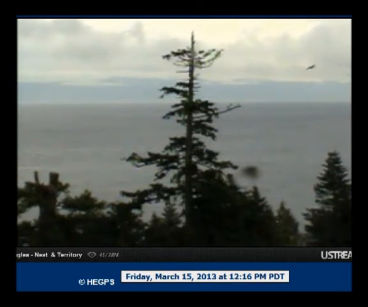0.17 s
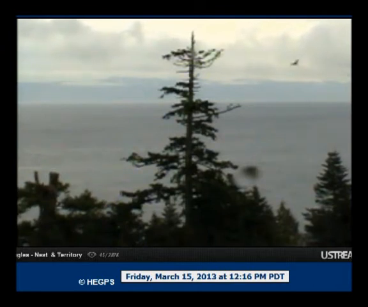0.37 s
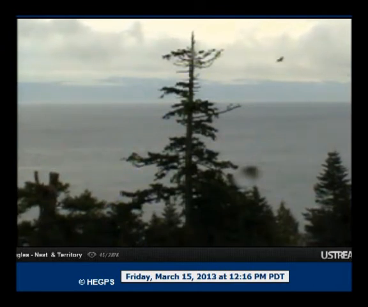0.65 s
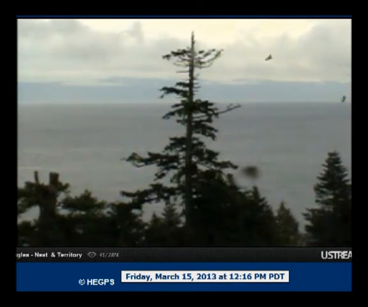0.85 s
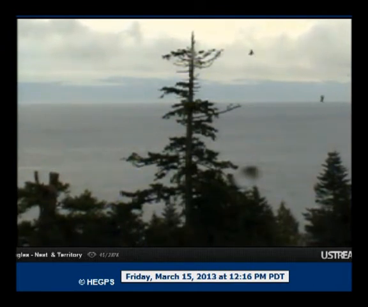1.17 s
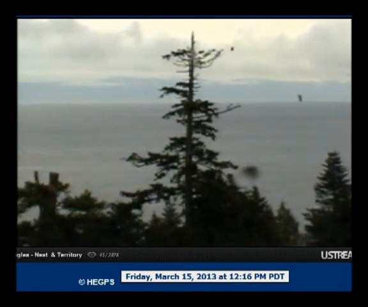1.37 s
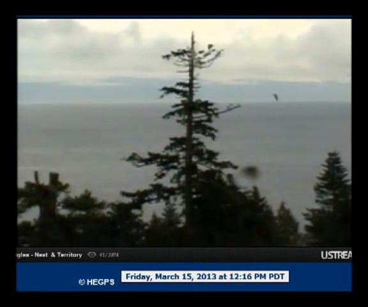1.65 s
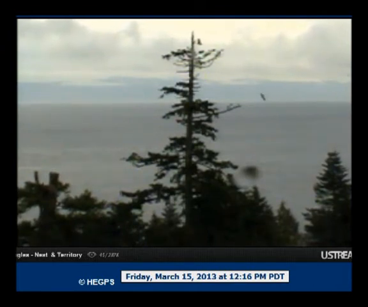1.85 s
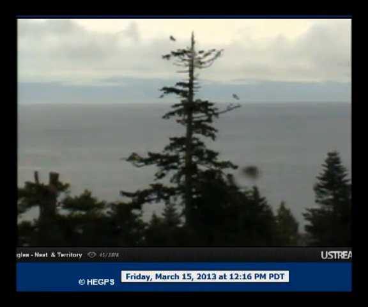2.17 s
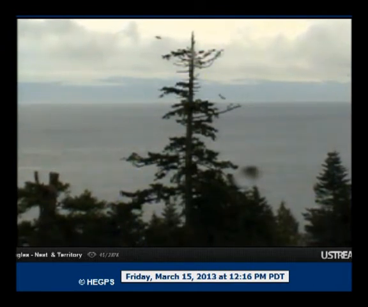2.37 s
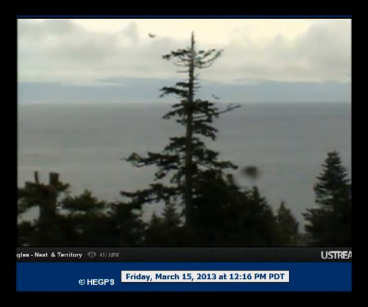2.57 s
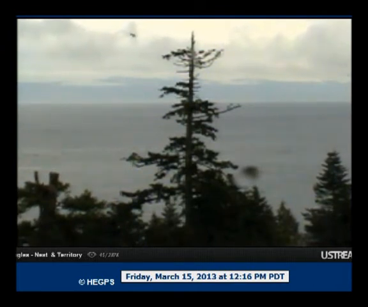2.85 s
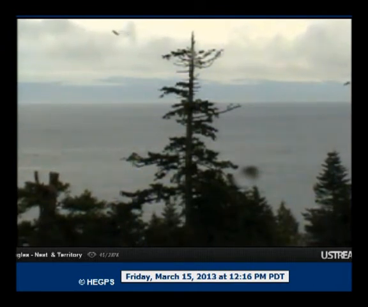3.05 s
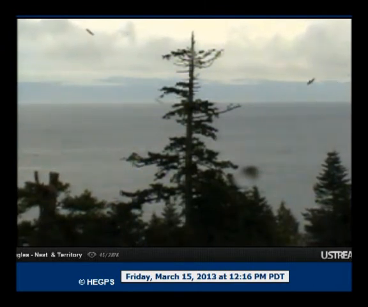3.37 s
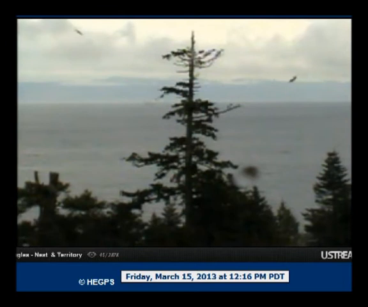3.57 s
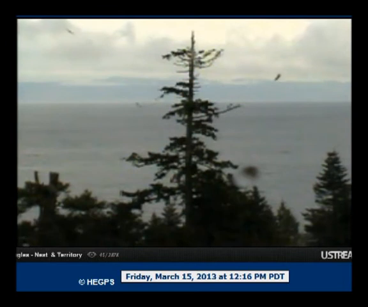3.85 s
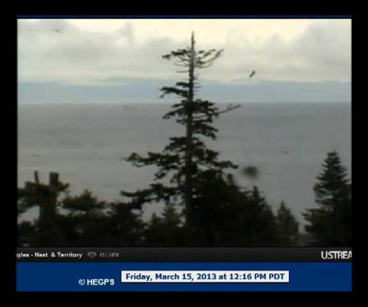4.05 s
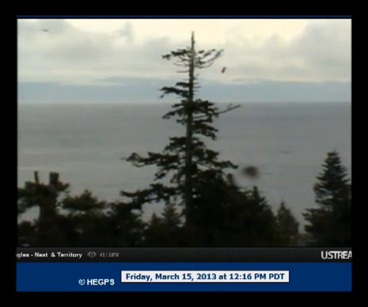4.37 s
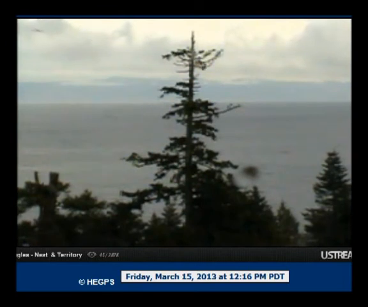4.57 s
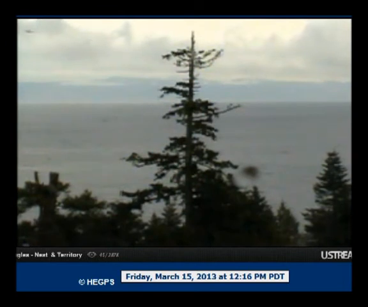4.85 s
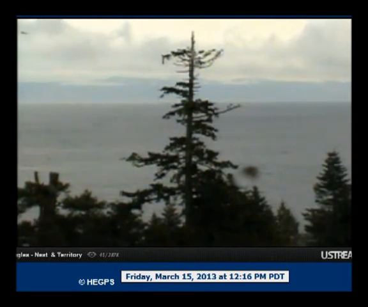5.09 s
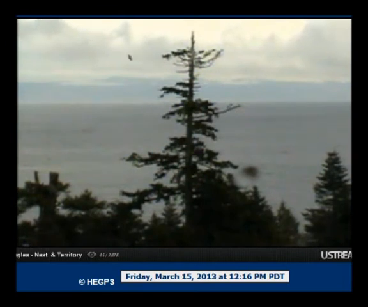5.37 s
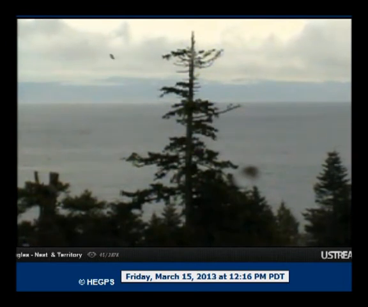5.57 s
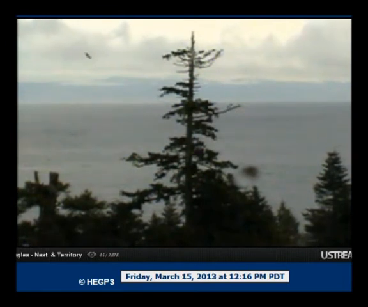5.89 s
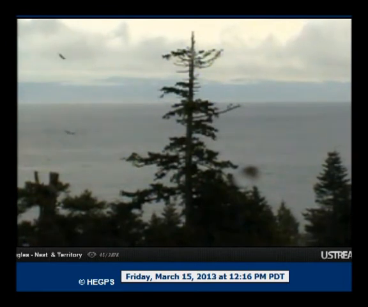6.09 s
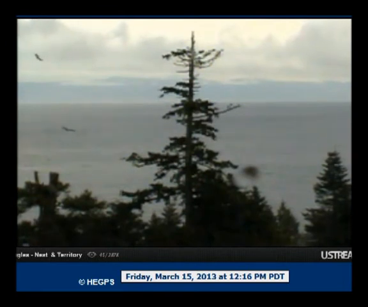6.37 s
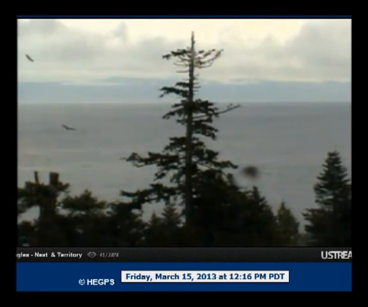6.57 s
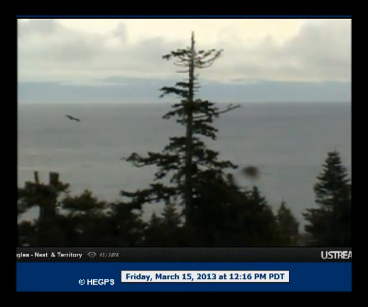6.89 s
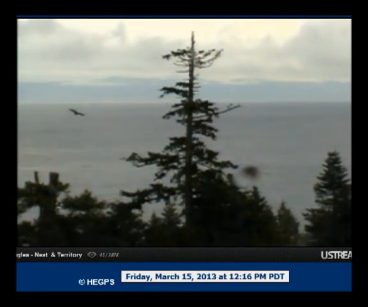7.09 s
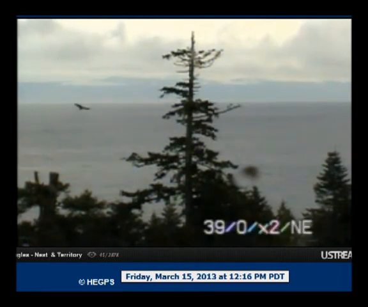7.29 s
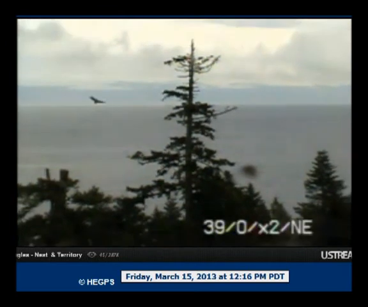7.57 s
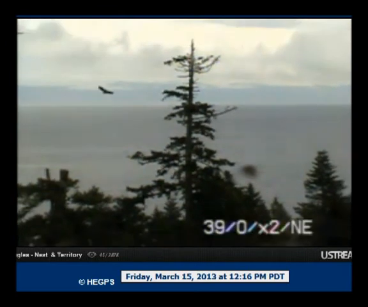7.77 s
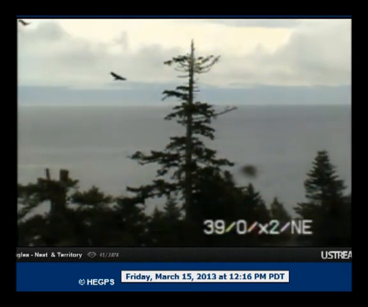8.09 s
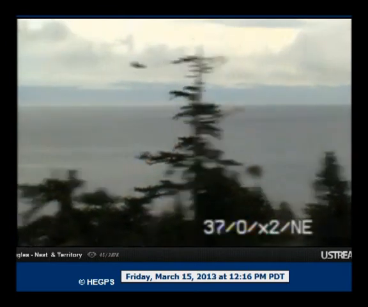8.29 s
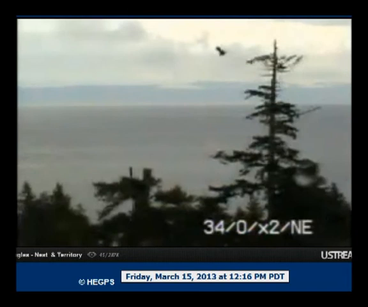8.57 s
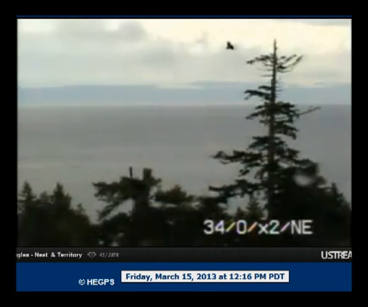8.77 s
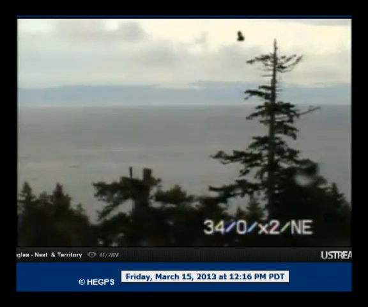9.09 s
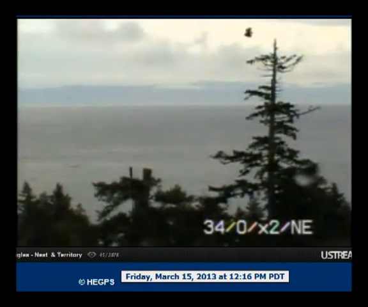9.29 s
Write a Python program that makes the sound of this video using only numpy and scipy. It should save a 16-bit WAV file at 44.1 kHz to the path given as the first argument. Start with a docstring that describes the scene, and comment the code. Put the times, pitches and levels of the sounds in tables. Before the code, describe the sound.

Among tall trees above the sea, eagles call in uneven runs of very brief, high, cracking chirps, starting about three seconds in and carrying on to the end with a light forest echo. Throughout, a far-off boat motor hums and wind buffets the slightly overdriven microphone, roughening the calls. Late on come a short whine and knock from a turning camera, then faint distant gull cries.

```python
"""Eagles chitter in tall trees above the sea: bursts of short, squeaky, raspy whistles, many breaking
to a lower voice, thrown back by near branches and the forest beyond. Far out on the water a boat engine
drones in a steady rumble. Wind thumps on the microphone, with a few rustles close by; near the end the
camera's pan motor whines and distant gulls mew. The outdoor microphone is overdriven by the rumble,
so the calls chop, crackle and distort, and it is sampled on an uneven clock."""
import sys
import numpy as np
from scipy import signal
from scipy.fft import rfft, irfft
from scipy.io import wavfile
from scipy.ndimage import uniform_filter1d, map_coordinates

SR = 44100
rng = np.random.default_rng(int(sys.argv[2]) if len(sys.argv) > 2 else 0)


def output_pcm(signal):
    """Save a mono or channel-first signal as 16-bit PCM at the path in sys.argv[1].

    Samples are clipped to [-1, 1] before scaling.
    """
    pcm = np.clip(np.atleast_2d(signal).T, -1, 1) * 32767
    wavfile.write(sys.argv[1], SR, np.round(pcm).astype(np.int16))


N = 415863
TIME = np.arange(N) / SR


def eagles(rasp_hz=172, chop_hz=120, throat_top_hz=4100, ordinary_db=-31):
    """Up in the trees, whistles scoop, dip and break; gives the sound sent to microphone and forest."""
    # calls: t/s, length/s, upper voice f/Hz, level/dB before the throat filter, break/share of call,
    # roughness/0-1, lower voice's slide/(Hz per ms), dip/share of pitch, loudest moment/share of call
    notes = [ (3.015, .058, 4000, -41.5, 0.7, 0.84, -19, 0, 0.09),
             (3.154, .02, 3960, -48, .5, .4, -26, .009, .45),
             (3.227, .045, 3980, -48, 0.65, 0.5, -12, 0, 0.28),
             (3.342, 0.018, 4000, -39, 0.84, 0.57, 0, 0.065, .6),
             (3.64, 0.03, 3790, -38.5, 1, 0.3, 0, 0, .5),
             (3.738, 0.032, 3820, -40.5, 0.68, .5, -10, 0, .45),
             (3.837, 0.019, 3710, -42, 0.95, .77, 0, 0.052, .5),
             (4.167, 0.058, 3910, -41, .82, 0.7, -19, 0.0014, 0.32),
             (4.403, .02, 3950, -43.5, 1, 0.53, 0, .01, .5),
             (4.534, 0.043, 3810, -40, 0.63, .8, -16, 0, 0.15),
             (4.961, 0.034, 3810, -31, 1, 0.63, -0.5, .16, 0.47),
             (5.073, 0.028, 3740, -28.5, 0.45, 0.4, 9, 0.021, 0.52),
             (5.205, 0.026, 3210, -31, 1, 0.15, 0, 0.11, 0.44),
             (5.669, 0.013, 3340, -44.5, 1, .1, 0, 0, .5), (5.755, 0.044, 3820, -36, 0.68, 0.6, -9, 0, .33),
             (5.862, 0.031, 3770, -31.5, 1, 0.5, 0, 0.032, 0.43),
             (5.963, 0.019, 3730, -36, 0.83, 0.5, -0.5, 0.041, .55),
             (6.403, .034, 4020, -33, .35, 0.4, 4, 0.026, 0.41),
             (6.509, .045, 3860, -39.5, 0.5, 0.55, -25, 0.02, 0.46),
             (6.605, 0.04, 3890, -42.5, .67, 0.7, -25, 0, 0.38),
             (6.743, 0.016, 3450, -45.5, 1, .5, 0, 0.0052, .5),
             (6.852, 0.042, 3640, -24, .02, 0.67, 8.5, 0.015, 0.49),
             (6.979, 0.049, 3750, -35, 0.67, .8, -5, 0.014, 0.4),
             (7.111, 0.027, 3820, -31.5, 1, 0.4, 0, .02, .25),
             (7.804, .05, 3930, -38.5, .82, .6, -15.5, 0, .42),
             (8.03, .037, 3960, -39, 0.76, 0.43, -19, 0.016, .4),
             (8.156, .04, 3950, -44.5, 0.5, 0.45, -22, 0.00015, .45),
             (8.276, 0.033, 3780, -35, 1, 0.96, 0, .11, .58),
             (8.391, 0.025, 3257, -30, 1, 0.36, 0, 0.053, 0.58),
             (8.497, 0.017, 3230, -36, .93, 0.4, -2, .077, .5),
             (8.864, .021, 3475, -36.5, 0.8, 0.4, 1, 0.032, .45),
             (9.058, 0.038, 3715, -34.5, 0.86, 0.39, 0, 0.073, 0.4),
             (9.168, .02, 3530, -35, 0.96, .33, 2, 0, 0.54), (9.28, .021, 3350, -32, 1, 0.2, 0, .145, 0.43),
             (9.398, 0.029, 3330, -30, 1, 0.45, 0, 0.17, 0.59)]
    direct, to_forest = np.zeros(N), np.zeros(N)
    warble, flutter = drift(2 * rasp_hz), drift(rasp_hz)
    grit = from_db(-5.5) * (band_noise(100, 750) + 1j * band_noise(100, 750))
    # the calls are chopped as engine hum overloads the microphone
    overload_chop = np.sin(phase_of(chop_hz * (1 + .25 * warble)))
    shake_db = 2.5 * flutter + 3.5 * overload_chop
    for start, length, hz, level_db, breaks_at, upper_roughness, slide, dip, loudest_at in notes:
        at, progress = during(start, length)
        since_break = (progress - breaks_at) * length
        broken = .5 + .5 * np.tanh(since_break / .0004)   # abrupt flip: 0 upper voice, 1 lower
        roughness = upper_roughness * .43 ** broken   # the lower voice is cleaner
        scoop = .12 * np.exp(-progress * length / .0025)
        sag = .017 * (progress - .5)
        pitch_dip = dip * np.exp(-((progress - .58) / .26) ** 2)
        upper_hz = hz * (1 - scoop - sag - pitch_dip)
        # the lower voice slides and arches about its own middle
        from_middle_ms = 1000 * length * (progress - (1 + breaks_at) / 2)
        lower_hz = .855 * hz + slide * from_middle_ms - .5 * from_middle_ms ** 2
        pitch = (upper_hz + broken * (lower_hz - upper_hz)) * (1 + .048 * roughness * warble[at])
        whistle = np.exp(1j * phase_of(pitch))
        edges = np.minimum(progress / .13, (1 - progress) / .16).clip(0, 1)
        catch_db = 10 * np.exp(-(since_break / .002) ** 2)   # the voice catches on the flip
        voice_db = 3.5 * broken - catch_db - 17.5 * np.abs(progress - loudest_at)
        envelope = rms_one(np.sin(np.pi / 2 * edges) ** 2 * from_db(voice_db + roughness * shake_db[at]))
        call = envelope * np.imag(whistle * (1 + roughness * grit[at]))
        direct[at] += from_db(level_db) * call
        # a bird facing the microphone is louder, its echo only slightly so
        to_forest[at] += from_db(ordinary_db + .25 * (level_db - ordinary_db)) * call
    return butterworth([direct, to_forest], throat_top_hz, order=10)


def call_distortion(calls, low_below_hz=3000, overload_db=-28.5):
    """Loud, low calls distort in the overloaded microphone, adding a harsh octave and a noisy spray."""
    low_calls = butterworth(calls, low_below_hz, order=8)
    power = uniform_filter1d(low_calls ** 2, size=64)
    drive = 1 + power / from_db(overload_db) ** 2
    octave = from_db(.5) * butterworth(drive * calls ** 2, 6200, order=4, kind="high")
    spray = from_db(3) * power * band_noise(5200, 7600)
    return octave + spray


def overload_crackles(half_length_s=.0015):
    """Brief, bright crackles of microphone overload during a few calls."""
    # crackles: t/s, level/dB
    crackles = [(3.025, -47), (4.183, -52), (4.542, -47), (4.980, -46), (6.875, -43), (6.999, -48)]
    envelope = sum(swell(centre, half_length_s, level_db) for centre, level_db in crackles)
    return envelope * band_noise(3760, 5570)


def ringing(start_s=8.88, length_s=.24, hz=3410, level_db=-54):
    """A thin tone lingers after one call and wavers in level."""
    out = np.zeros(N)
    at, progress = during(start_s, length_s)
    envelope = fade_ends(progress, length_s, edge_s=.02) * from_db(level_db + 3.5 * drift(25)[at])
    out[at] = np.sqrt(2) * envelope * np.sin(2 * np.pi * hz * TIME[at])
    return out


def tree_echoes(calls, to_forest, blur_hz=150):
    """Near branches answer at once; the forest beyond gives a long, diffuse echo, blurred in pitch."""
    # strength of the far echo: t/s, gain/dB
    echo_gain = [(3.0, -16.5), (7.2, -14.5), (7.8, -18.5), (8.15, -16.5), (8.6, -6), (9.4, -9.5)]
    near = from_db(-13.5) * scatter(calls, echoes_per_s=2700, t60_s=.054)
    diffuse = to_forest * drift(blur_hz) * from_db(np.interp(TIME, *np.transpose(echo_gain)))
    return near + scatter(diffuse, echoes_per_s=770, t60_s=1)


def scatter(x, echoes_per_s, t60_s):
    """Trunks and branches throw back a thin, dying spray of echoes."""
    t = TIME[:SR]
    echoes = rng.standard_normal(SR) * (rng.random(SR) < echoes_per_s / SR)
    spray = echoes * (t > .004) * from_db(-60 * t / t60_s)
    return signal.fftconvolve(x, rms_one(spray) / np.sqrt(SR))[:N]


def boat_engine(waver_db=2.5, wander_hz=.693):
    """Low engine lines fade and wander on their way over the water; the strong hum swells as one."""
    # engine lines: f/Hz, rms level/dB before swell and waver
    lines = [(40.5, -32.5), (58.5, -32), (64, -34), (83, -35.5), (120.5, -28.5), (125.5, -25), (129, -25),
             (136, -25.5), (146.5, -25.5), (193, -34.5), (211, -37.5), (257.6, -37), (276, -42.5),
             (322, -42.5), (340, -35.5), (359, -41.5), (404, -47)]
    # swell and ebb of the hum: t/s, gain/dB
    hum_swell = [(0, -1.5), (1.1, -2.5), (1.75, 3.5), (2.1, 1), (2.4, 2.5), (3.1, -1), (3.5, 3), (3.8, -3),
                 (4.6, -3), (5.2, 2.5), (5.95, -4.5), (6.3, 4.5), (6.6, -4.5), (7.0, 2.5), (7.5, -5),
                 (7.8, 0), (8.55, 3.5), (9.4, -5.5)]
    out, swell_db = np.zeros(N), np.interp(TIME, *np.transpose(hum_swell))
    for hz, level_db in lines:
        phase = 2 * np.pi * rng.random() + phase_of(hz + wander_hz * drift(1.5))
        in_hum = 115 < hz < 140
        envelope = from_db(level_db + in_hum * swell_db + waver_db * drift(1.92))
        out += np.sqrt(2) * envelope * np.sin(phase)
    return out


def rumble(level_db=-19):
    """Wind, sea and exhaust merge into a bed of low noise, lifted at a few hollow resonances."""
    # spectrum of the bed: f/Hz, relative density/dB
    spectrum = [(10, -20), (25, -8), (50, -6.5), (75, -1), (110, 3), (170, -4), (240, -12), (300, -9),
                (470, -19), (720, -23), (1050, -23.5), (2000, -34.5), (3200, -43.5), (5000, -94.5)]
    # hollow resonances: f/Hz, width/Hz, lift/dB
    hollows = [(124.8, 25.3, 6), (348, 64, 9), (591, 78, 9.5), (818, 60, 6.5)]
    hz = np.maximum(np.arange(N // 2 + 1) * SR / N, 1)
    point_hz, point_db = np.transpose(spectrum)
    colour_db = np.interp(np.log(hz), np.log(point_hz), point_db)
    for centre, width, lift_db in hollows:
        colour_db += lift_db / (1 + (2 * (hz - centre) / width) ** 2)
    noise = irfft(rfft(rng.standard_normal(N)) * from_db(colour_db), N)
    return from_db(level_db) * rms_one(noise)


def wind(breeze_db=-33):
    """A steady breeze and a few gusts thump right on the microphone, in the deep bass."""
    # gusts: centre t/s, half length/s, level/dB
    gusts = [(2.15, 0.48, -26.5), (5.2, 1.6, -24), (6.8, 0.22, -20), (7.24, .18, -17.5), (8.0, .35, -27),
             (9.2, 0.16, -22.5)]
    power = from_db(breeze_db) ** 2 + sum(swell(*gust) ** 2 for gust in gusts)
    return np.sqrt(power) * band_noise(21.4, 85)


def pan_motor(start_s=8.47, stop_s=8.66, first_hz=1232, full_hz=1297, knock_hz=1220):
    """The camera turns: its motor whines higher and louder as it speeds up, then halts with a knock."""
    whine, length = np.zeros(N), stop_s - start_s
    at, speed = during(start_s, length)
    pitch = (first_hz + (full_hz - first_hz) * speed) * (1 + .008 * drift(40)[at])
    envelope = fade_ends(speed, length, edge_s=.01) * from_db(np.interp(speed, [0, 1], [-42, -29.5]))
    whine[at] = np.sqrt(2) * envelope * np.sin(phase_of(pitch))
    since_knock = TIME - stop_s - .022
    knock_envelope = (since_knock / .0055).clip(0, 1) * np.exp(-np.abs(since_knock) / .022)
    return whine + from_db(-29) * knock_envelope * band_noise(knock_hz / 1.11, knock_hz * 1.12)


def rustles():
    """Soft, brief swells of mid-range noise close to the microphone."""
    # rustles: centre t/s, half length/s, f/Hz, level/dB
    stirs = [(1.37, 0.11, 1750, -40.5), (1.66, 0.068, 1520, -41), (2.007, 0.1, 1600, -40),
             (5.522, 0.015, 1310, -34.5)]
    return sum(swell(centre, half_length, level_db) * band_noise(hz / 1.41, hz * 1.23, order=3)
               for centre, half_length, hz, level_db in stirs)


def gulls(climb_share=.66):
    """Far off, each mew climbs slowly, brightens and drops at its end."""
    # cries: t/s, length/s, top f/Hz, fundamental's starting level/dB, second harmonic's final level/dB
    cries = [(9.012, .36, 1478, -42, -50.5), (9.129, 0.2, 1206, -52, -47)]
    out, judder = np.zeros(N), 1 + .0074 * drift(40)
    for start, length, top_hz, first_db, second_db in cries:
        at, progress = during(start, length)
        climb = .15 * (1 - progress / climb_share) ** 2
        drop = .19 * ((progress - climb_share) / (1 - climb_share)) ** 2
        below_top = np.where(progress < climb_share, climb, drop)
        phase = phase_of(top_hz * (1 - below_top) * judder[at])
        fundamental = from_db(first_db - 8 * progress) * np.sin(phase)
        second = from_db(second_db + 10 * (progress - 1)) * np.sin(2 * phase)
        out[at] += np.sqrt(2) * fade_ends(progress, length, edge_s=.02) * (fundamental + second)
    return out


def from_db(db):
    """Decibels to gain."""
    return 10 ** (np.asarray(db) / 20)


def rms_one(x):
    """Scale to unit rms."""
    return x / np.sqrt(np.mean(x ** 2) + 1e-20)


def phase_of(hz):
    """Running phase in radians of a changing pitch."""
    return 2 * np.pi * np.cumsum(hz) / SR


def drift(rate):
    """Smooth random motion of unit rms that changes about rate times a second."""
    pole = np.exp(-20 * np.pi * rate / SR)   # runs at a tenth of the sample rate
    slow = signal.lfilter([1], [1, -2 * pole, pole * pole], rng.standard_normal(N // 10 + 8002))[8000:]
    return np.interp(np.arange(N) / 10, np.arange(len(slow)), rms_one(slow))


def butterworth(x, hz, order, kind="low"):
    """Filter with a flat passband."""
    return signal.sosfilt(signal.butter(order, hz, kind, fs=SR, output="sos"), x)


def band_noise(low_hz, high_hz, order=2):
    """Noise of unit rms between two edges."""
    return rms_one(butterworth(rng.standard_normal(N), [low_hz, high_hz], order, "band"))


def during(start, length):
    """The samples of an event and its progress from 0 to 1."""
    at = np.flatnonzero((TIME >= start) & (TIME < start + length))
    return at, (TIME[at] - start) / length


def fade_ends(progress, length, edge_s):
    """Straight fades at both ends of an event."""
    return (np.minimum(progress, 1 - progress) * length / edge_s).clip(0, 1)


def swell(centre_s, half_length_s, peak_db):
    """A bell-shaped rise and fall in gain."""
    return from_db(peak_db) * np.exp(-((TIME - centre_s) / half_length_s) ** 2)


def scene():
    """One microphone among the trees: the eagles and their echoes over boat, wind and sea."""
    calls, to_forest = eagles()
    birds = calls + tree_echoes(calls, to_forest) + call_distortion(calls)
    background = boat_engine() + rumble() + wind() + gulls() + pan_motor() + rustles()
    return (birds + ringing() + overload_crackles() + background)[None]


def record(dry, trough=.27, ceiling=.3, clock_hz=48000):
    """The microphone input overloads; the uneven clock adds thin side tones over hiss; the top is cut."""
    x = dry[0]
    x = x / (1 + (np.maximum(-x, 0) / trough) ** 7) ** (1 / 7)   # troughs bend softly
    x = butterworth(x, 3, order=1, kind="high")
    x = x / (1 + (np.maximum(x, 0) / ceiling) ** 24) ** (1 / 24)   # crests clip hard
    # each sample is pulled to the nearest tick of a faster clock, giving every tone high side tones
    tick_times = np.round(TIME * clock_hz) / clock_hz
    side_tones = map_coordinates(x, [tick_times * SR], order=3, mode="nearest") - x
    hiss = from_db(-64.5) * band_noise(1500, 5000)
    x = x + butterworth(side_tones + hiss, 8880, order=16)
    return butterworth(x, 10700, order=14)[None]


dry = scene()
out = record(dry)
output_pcm(out)
```